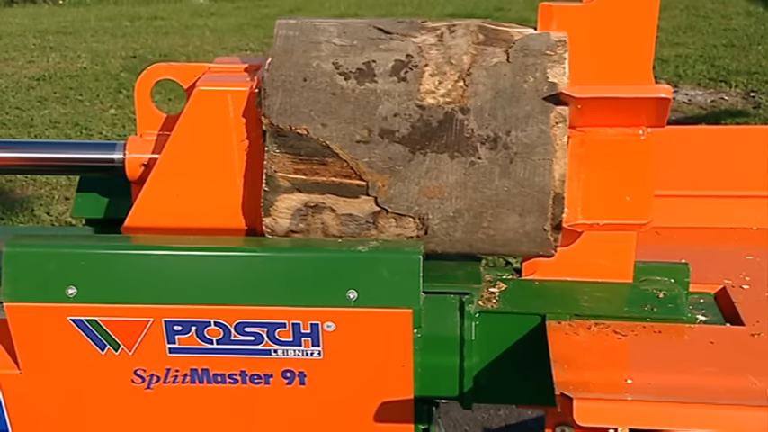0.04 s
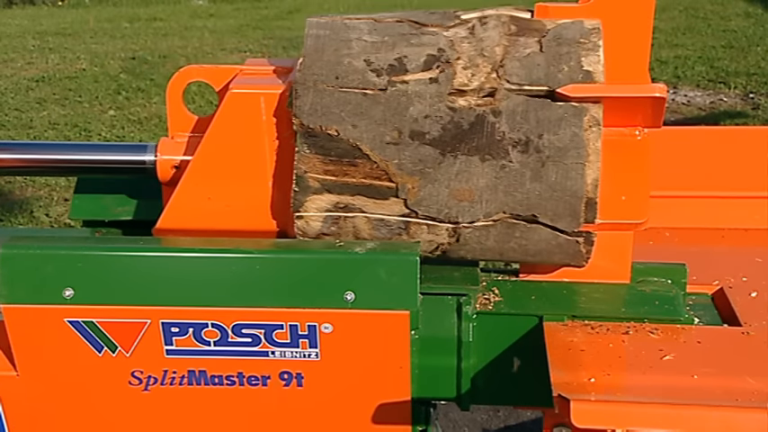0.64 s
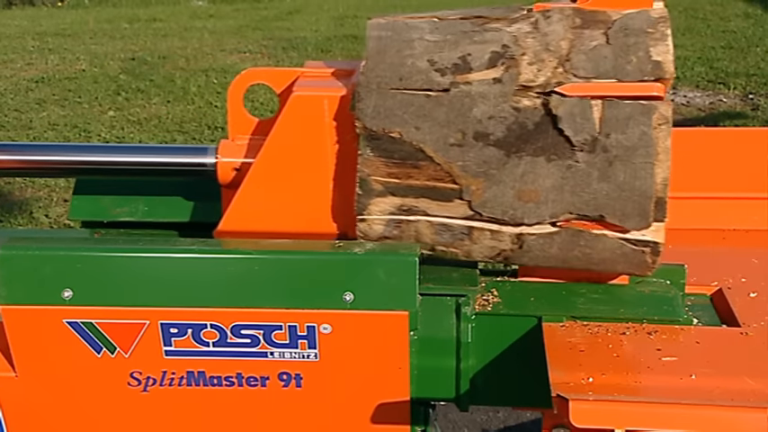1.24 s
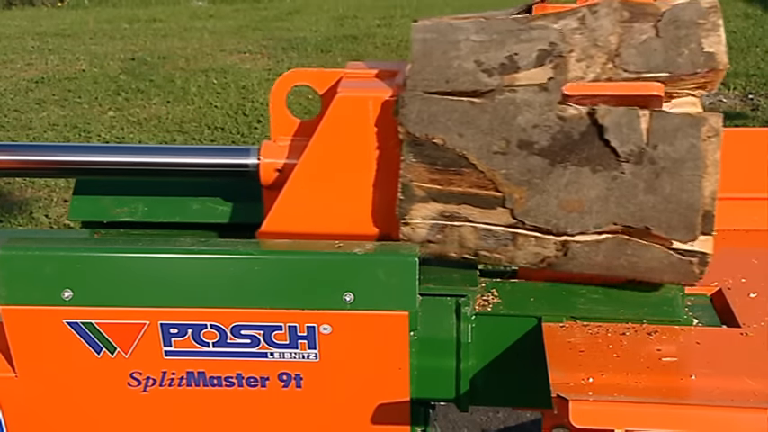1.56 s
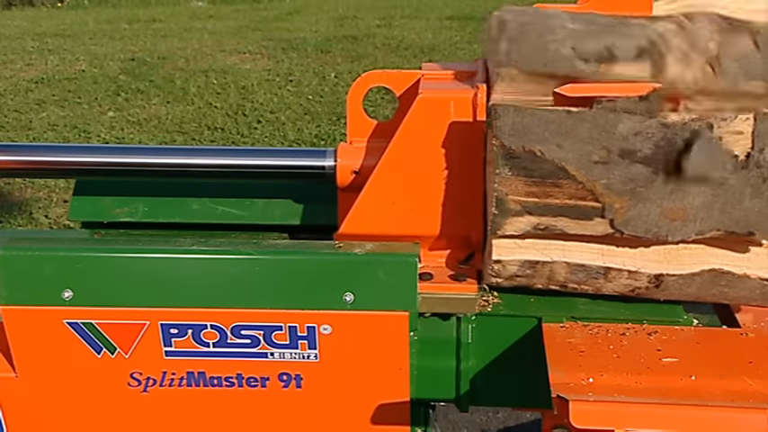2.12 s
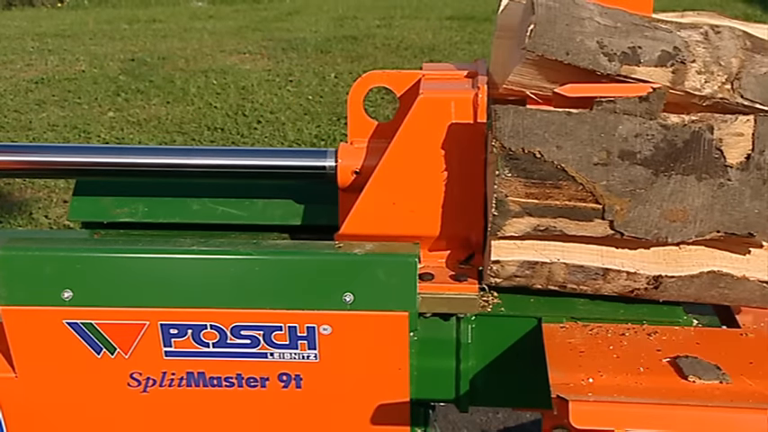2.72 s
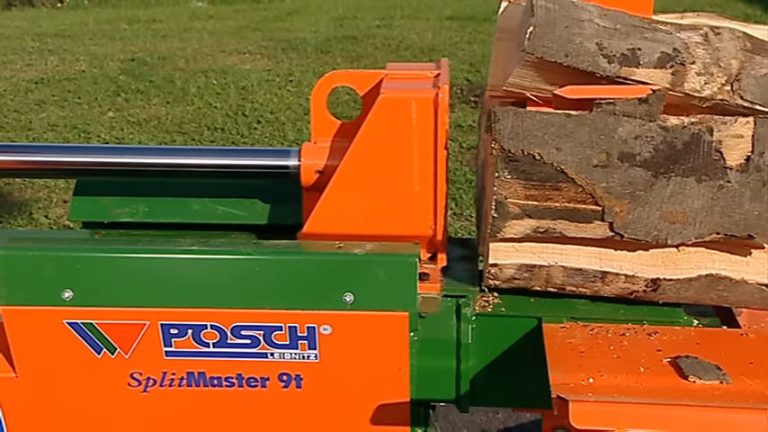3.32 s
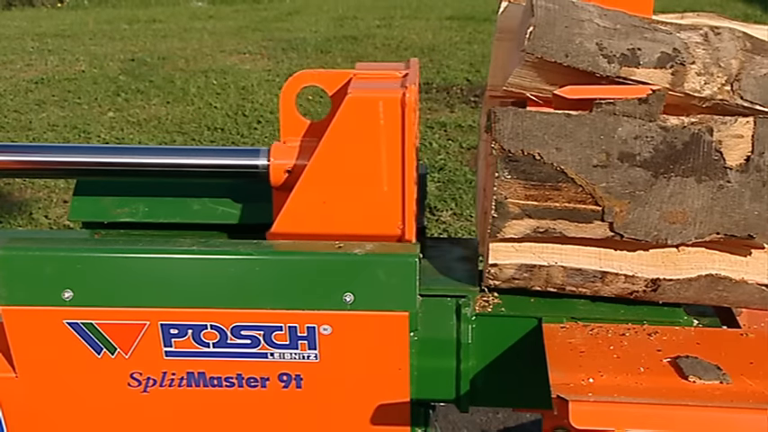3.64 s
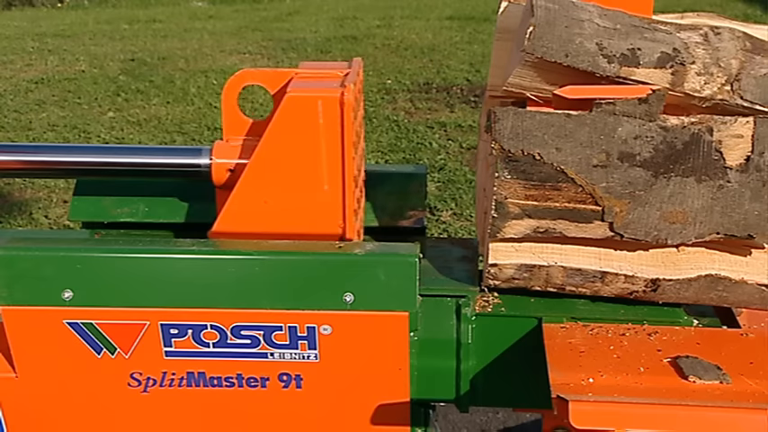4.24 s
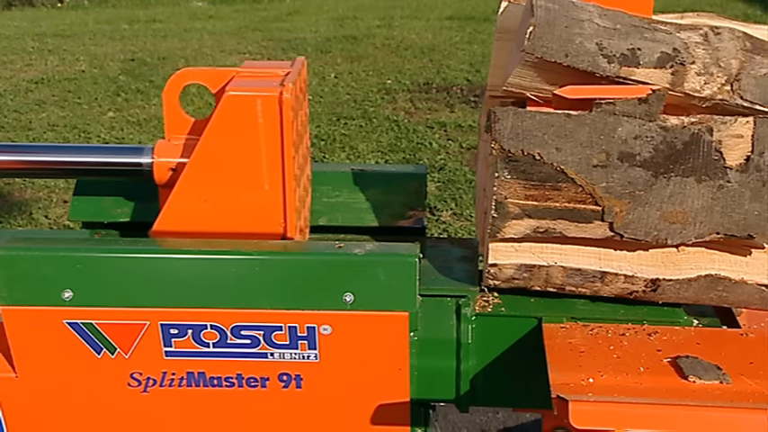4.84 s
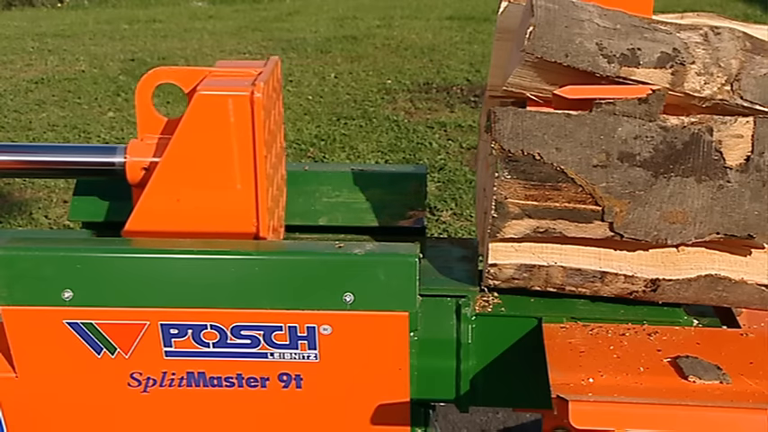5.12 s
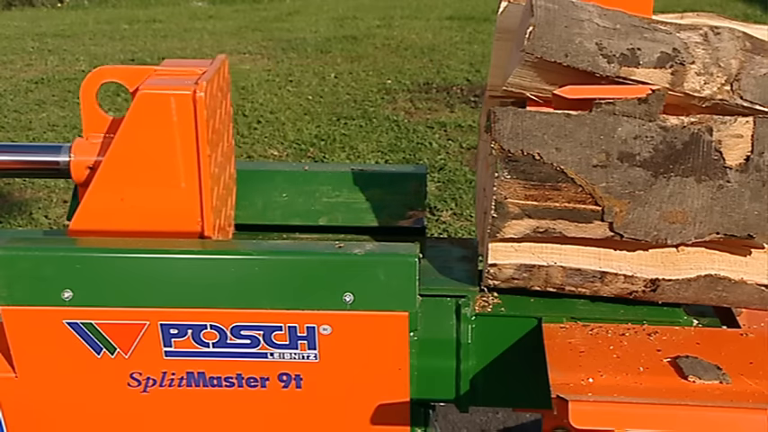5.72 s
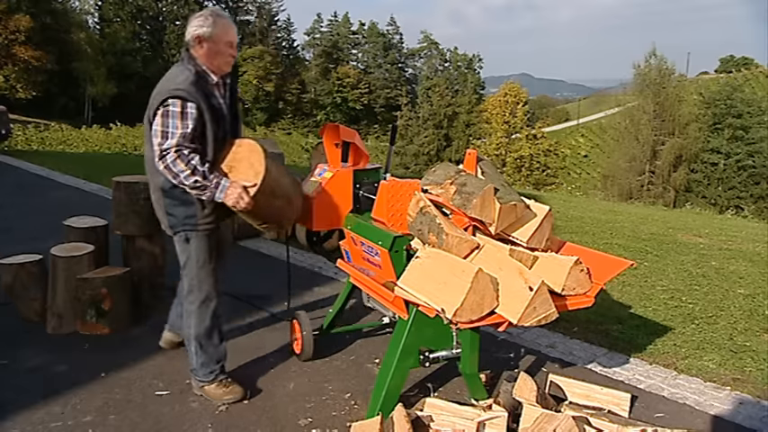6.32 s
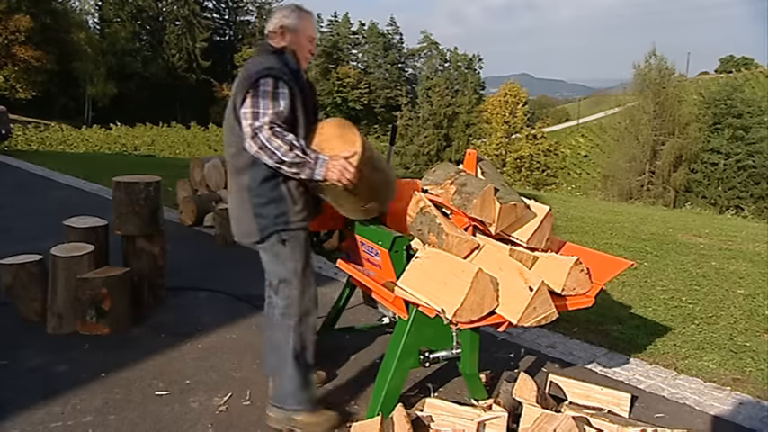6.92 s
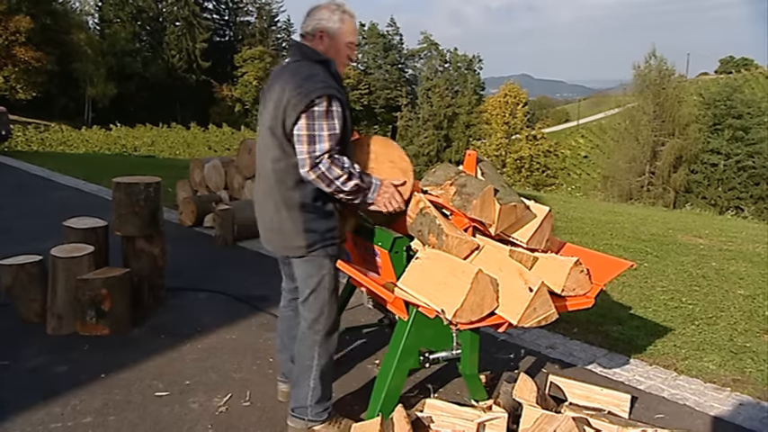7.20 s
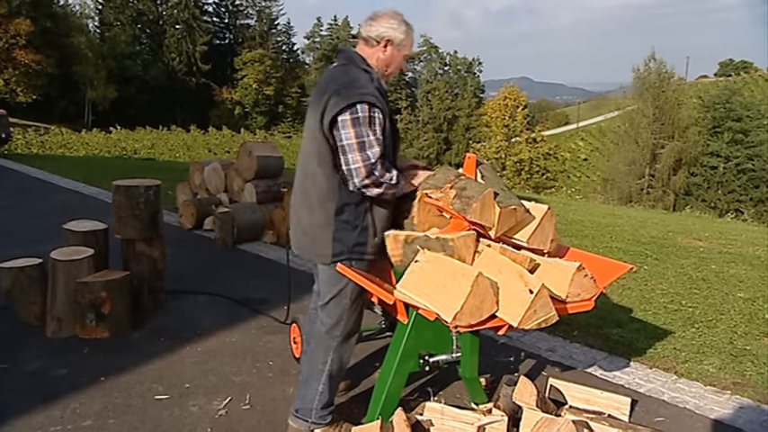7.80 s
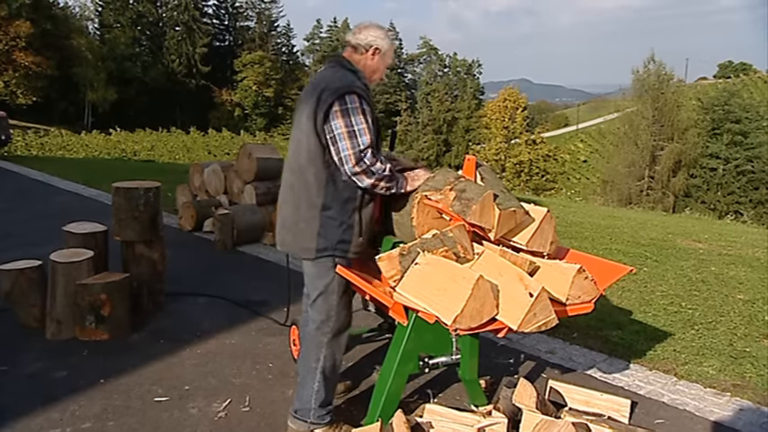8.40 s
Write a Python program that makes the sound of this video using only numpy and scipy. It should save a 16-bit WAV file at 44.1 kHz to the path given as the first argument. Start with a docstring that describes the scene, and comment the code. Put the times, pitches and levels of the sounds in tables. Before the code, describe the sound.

Wood cracks and splinters over a hydraulic splitter's steady hum outdoors; the ram returns with faint squeaks, and another log clunks down.

```python
"""An electric log splitter works outdoors in a faint breeze, heard first from close by. Its gear pump
hums and sags under load as a log is forced onto the wedge: fibres crunch and snap, and the wood tips onto
the tray. Near 3 s the ram reverses, slides back with stick-slip squeaks and, as the valve whistles,
knocks against its stop. From 6 s the listener is a few steps away: neighbouring pump tones beat in a
throb, a latch or guard clicks, and the next log is set down on the ringing steel bed."""
import sys
import numpy as np
from scipy import signal
from scipy.fft import irfft
from scipy.io import wavfile

SR = 44100
rng = np.random.default_rng(int(sys.argv[2]) if len(sys.argv) > 2 else 0)


def bounce(signal):
    """Save signal as a 16-bit WAV file at the path given by the first command-line argument."""
    frames = np.transpose(np.atleast_2d(signal))
    limited = np.clip(frames, -1, 1)
    pcm = np.round(limited * 32767).astype(np.int16)
    wavfile.write(sys.argv[1], SR, pcm)


N = 377055
T = np.arange(N) / SR

TEETH, IDLE_TURNS_PER_S, SAG_TURNS_PER_S = 12, 24.93, .33
FREE_S, REVERSE_S, STOP_S = 2.44, 2.97, 5.72  # the ram is through the log, turns back, stops
SWITCH_S = .072  # the valve's changeover time
STEP_BACK_S, SHADE_S = 6.05, (7.9, 7.7)  # the listener is farther off; a man steps in front of the pump

# Load on the pump: time_s, share_of_full_load
LOAD = [(0, .4), (1.3, 1), (1.75, 1), (2.35, 0), (2.85, 0), (3.1, .15), (5.55, .18), (5.95, 0)]
# Pump levels by working state: pushing_db, starting_back_db, arriving_db, resting_db, far_db, shaded_db
MESH_LEVELS = [(-51.5, -28.5, -33, -38.5, -46.5, -51), (-49, -38, -34.5, -36, -41.5, -43.5),
               (-54, -33, -41, -40.5, -49.5, -44), (-59, -51.5, -45, -45.5, -48, -49),
               (-86, -56.5, -50.5, -49.5, -54, -52)]  # one row for each of meshing harmonics 1 to 5
UNEVEN_LEVELS = (-8, -3, 4, 1.5, 1.5, -5)  # added to the other shaft orders
RUSH_LEVELS = (-45, -39.5, -36.5, -39.5, -45.5, -46)  # oil flow below 2 kHz
HISS_LEVELS = (-54, -49, -43.5, -47, -57, -58)  # oil flow in the treble
FIZZ_LEVELS = (-59, -56.5, -54, -53, -58, -62.5)  # oil flow in the top octave
# Lowest meshing tone while the ram pushes (its overtones follow less): time_s, gain_db
PUSH_HUM = [(.6, 4), (1.1, -2), (1.4, 3.5), (1.7, 3.5), (2, 14), (2.35, 6.5), (2.7, 12.5)]
# Swells along the ram's path, by harmonic: depth_db, travel_from_turning_point_s
SWELLS = [(2.5, 0.41), (0.3, 0.15), (1.5, 0.53), (2, 0.3), (8.5, 0.45)]
# Wavering as the man walks through the sound's path, by harmonic: spread_db
FAR_WANDER_DB = (2, 1, 1.8, 1, 1.3)
# Fourth meshing harmonic from farther off: time_s, gain_db
FAR_FOURTH_HARMONIC = [(6.05, 1.5), (6.45, -4), (6.65, 1), (7.15, 5.5), (8, -6), (8.5, 4.5)]
# Tones of unequal teeth, at multiples of the shaft speed: order, near_db, far_db
SHAFT_ORDERS = [(13, -51, -60), (19, -49, -67), (22, -60, -50), (23, -41.5, -41.5), (25, -53, -51),
                (26, -45, -48), (27, -55, -57), (28, -54, -67), (29, -53, -66), (30, -51, -69),
                (31, -55, -65), (39, -53, -59), (40, -54, -56), (43, -58, -66), (62, -63, -62),
                (67, -60, -58), (68, -60, -53), (69, -63, -56), (70, -64, -57), (71, -58, -55),
                (72, -57, -51), (76, -60, -66)]
# Thin whine of the higher meshing harmonics: harmonic, near_db, far_db
WHINE = [(8, -66, -71), (10, -69, -67), (11, -70, -67), (12, -72, -65), (13, -66.5, -71), (14, -74, -67),
         (16, -67, -68), (21, -68, -71), (28, -73, -73)]
# Bands that swell once a turn: low_hz, high_hz, near_moment_turns, far_moment_turns
THROBS = [(520, 690, .3, .88), (930, 1100, .3, .02), (1650, 1850, .55, .06)]
# Lowest throbbing band from farther off: time_s, gain_db
FAR_THROB = [(6.1, -2.5), (6.45, -4.5), (6.9, 0), (7.25, -4.5), (8.1, -2.5), (8.45, 2.5)]
# Spectra of the pump's buzz and oil hiss: frequency_hz, gain_db
FLOW_NEAR = [(40, -17), (70, -13), (150, -16), (320, -4), (700, -3), (1100, -6), (1400, -5), (1850, 0),
             (2300, -4.5), (3400, -4.5), (4500, -5.5), (5300, -6), (8000, -6.5), (12500, -8), (15800, -15)]
FLOW_FAR = [(40, 5), (150, -4.5), (400, 4), (1100, 4), (1350, -1), (1750, 6.5), (2200, -0.5), (4700, 4),
            (5300, -2.5), (8000, -7), (12000, -12.5), (15800, -13)]
# Housing resonances (flow() strengthens those above 5 kHz): centre_hz, width_hz, base_gain_db
HOUSING_NEAR = [(3880, 120, 4), (4800, 160, 4), (7690, 270, 4), (9020, 140, 5), (9600, 130, 3),
                (10720, 140, 4), (11330, 200, 6), (11890, 200, 4), (13440, 360, 6), (14020, 300, 3),
                (14620, 70, 4), (14880, 370, 6)]
HOUSING_FAR = [(2460, 65, 6.9), (3600, 170, 1.8), (5600, 74, 6), (6040, 96, 4.3), (8030, 72, 9.4),
               (8230, 71, 4.7), (9300, 160, 2.5), (10100, 180, 5), (10670, 240, 4.3), (11120, 170, 5.3),
               (11180, 190, 3.6)]
# Wood crushed against the wedge: time_s, groan_db, splinter_db
CRUSH_LEVELS = [(0, -30, -40), (.07, -27.5, -28.5), (.32, -27.5, -25.5), (.52, -31, -39), (.81, -35, -45.5),
                (.895, -30.5, -39), (1.07, -39, -50), (1.23, -44, -45), (1.34, -48.5, -55),
                (1.56, -39.5, -42.5), (1.67, -42.5, -47), (1.82, -37, -46.5), (2.08, -41, -41),
                (2.16, -30.5, -60), (2.3, -36, -52)]
# Resonances of the steel frame and tray: centre_hz, width_hz, gain_db
FRAME_RESONANCES = [(333.3, 8.1, 6), (366, 3.8, -14), (579, 68, 8), (650, 19, 4.5), (716, 14, -28),
                    (858, 56, 6.5), (1318, 97, 5.5), (1655, 50, 6), (2107, 55, 5), (2460, 110, 2.5),
                    (2950, 44, 0), (4410, 100, 6.5), (4950, 110, 5), (8100, 400, 8)]
# Spectra of crushed wood, breeze, snaps and knocks: frequency_hz, gain_db
CRUSH_SPECTRUM = [(50, -62), (100, -20.5), (230, -11.5), (330, -0.5), (450, -8), (870, -4), (1190, -11.5),
                  (1550, -10), (1930, -9.5), (4480, -11.5), (7000, -21.5), (11000, -39), (15800, -43)]
BREEZE_SPECTRUM = [(15, -13), (35, 9), (60, -1.5), (120, -5.5), (300, -13), (1000, -53)]
SNAP_SPECTRUM = [(50, -23), (130, -14), (400, 1.5), (1000, 6.5), (2200, -3.5), (3400, 1.5), (4500, 1.5),
                 (6000, 0.5), (8500, -2), (11000, -1), (15800, -14)]
KNOCK_SPECTRUM = [(30, -60), (70, -17.5), (140, -15.5), (380, -2), (513, -0.5), (728, 0.5), (1030, -3),
                  (1800, -6), (3000, -8.5), (6000, -20), (10600, -29.5), (15800, -39)]
# Sharp snaps and clicks: splinters breaking and, near 7.1 s, a latch or guard clicking:
# start_s, level_db, pitch_hz, thickness_share, brightness
SNAPS_AND_CLICKS = [(0.019, -14.5, 4460, .1, 1), (0.0416, -23, 2570, 0.1, -14), (.0695, -16, 2600, 0.5, -6),
                    (0.1047, -18.5, 4400, 0.7, -9), (0.1452, -14, 2550, .7, -16),
                    (0.1816, -15.5, 3880, 0.2, -2), (.24, -18, 4250, 0.75, -27),
                    (0.298, -18, 3950, 0.87, -5), (0.349, -16, 3380, 1, -11), (0.41, -17.5, 3930, 0.8, -14),
                    (0.4292, -19.5, 3600, 0, 3), (.5345, -27.5, 4030, 0.2, -13),
                    (0.623, -22, 4300, 0.9, -22), (0.7761, -21, 3500, 0.65, -12),
                    (.852, -26.5, 4400, 0.3, -14), (0.886, -22, 3550, 0.73, -9),
                    (.947, -25, 3760, 0.8, -12), (.9875, -29, 4200, 0.1, -16), (1.0051, -22, 5440, 0, -12),
                    (1.03, -21.5, 4730, 0.4, -3), (1.07, -32, 4600, .1, 9), (1.104, -33, 4000, .2, -7),
                    (1.1327, -25, 3300, 0.2, -6), (1.146, -30, 3100, .3, -18), (1.173, -20, 3500, 0.2, -21),
                    (1.184, -27, 4020, 0.3, -10), (1.2017, -15, 2520, 0.1, -10), (1.22, -17, 2470, 0.1, -8),
                    (1.2427, -18.5, 3700, 0.9, -2), (1.255, -25, 3300, 1, -21), (1.355, -28, 4250, .2, -18),
                    (1.417, -32, 3240, 0, -16), (1.4597, -23.5, 4330, 0.1, -4),
                    (1.475, -26, 2850, 0.6, -21), (1.508, -24, 2830, 0.8, -29),
                    (1.533, -25, 4500, 0.64, -9), (1.538, -24, 4200, .1, -14), (1.5512, -21, 4200, 0, -7),
                    (1.561, -12, 4480, 0, -11), (1.605, -18, 4640, 0.35, -20), (1.613, -25, 3700, 0, -12),
                    (1.679, -29, 3950, 0.7, -5), (1.697, -28, 4500, .1, 2), (1.712, -24.5, 4200, 0, 3),
                    (1.7634, -21, 3600, 0, -9), (1.776, -27, 4200, 0.5, -8), (1.783, -25, 4400, 0.5, -9),
                    (1.803, -20, 4350, 0.1, -19), (1.882, -30, 3800, .4, 7), (1.936, -29.5, 4180, 0, -2),
                    (1.9537, -25, 3500, 0.1, -13), (2.005, -28.5, 4400, .2, -5),
                    (2.074, -26.5, 4000, 0.9, -11), (2.157, -30, 4500, .2, -6),
                    (2.282, -32.5, 4200, 0.3, -22), (2.342, -36, 3430, .7, -20),
                    (2.4537, -27, 3100, 1, -13), (2.487, -38, 3800, .5, -18), (2.528, -37.5, 3600, .3, -20),
                    (3.0022, -22, 4380, 0.2, -12), (3.1228, -28.5, 4410, 0.1, -23),
                    (3.6556, -22, 2800, 1, -32), (7.096, -24, 4200, 0.9, 9), (7.0981, -21.5, 2950, 0.5, -9),
                    (7.953, -21, 3470, 0.65, -21)]
# Wedge or bed singing as wood rubs past: start_s, length_s, pitch_hz, level_db
SINGS = [(.03, .4, 1668, -45), (.42, .3, 1668, -44), (1.83, .14, 1668, -50), (2.33, .06, 1668, -50),
         (7.478, .06, 2955, -38)]
# Low bounces of the machine under a log or the ram: start_s, pitch_hz, level_db, t60_s
THUMPS = [(.048, 304, -20, 0.23), (.085, 348, -22, 0.23), (1.563, 55, -44, 0.19), (2.138, 634, -18, 0.076),
          (2.165, 333, -23, .1), (2.207, 320, -23, 0.086), (3.004, 354, -28, .12), (5.745, 319, -27, 0.35),
          (5.749, 472, -35, 0.35), (5.752, 383, -35, .6), (7.109, 265, -30, 0.2), (7.445, 140, -13, 0.03),
          (7.444, 408, -18.5, 0.11), (7.553, 173, -26, 0.05), (7.774, 128, -33, 0.14),
          (7.806, 169, -30, 0.095)]
# Wood and ram striking steel: start_s, level_db, bass_db, treble_db, rise_s
KNOCKS = [(0.054, -31, 13, -17, 0.0047), (1.564, -58, 12, 2, .001), (2.124, -27, 14, 6, 0.0027),
          (2.136, -30, -1, -12, 0.0027), (2.158, -34, 2, -3, .004), (2.195, -31.5, 6, 10, .008),
          (2.966, -33, -20, 2, .005), (2.984, -28, 7, 12.5, 0.0017), (2.999, -29, 5.5, -12, 0.0027),
          (5.703, -23.5, -32, 13, 0.0011), (5.735, -23.5, 2, 14, 0.0036), (5.748, -29, 14, 4, 0.0017),
          (5.773, -31.5, 6, 15, 0.0035), (7.028, -36.5, 22, -20, 0.00082),
          (7.108, -30.5, 11.5, -10, 0.0026), (7.4426, -20, 6, -0.5, 0.0011), (7.466, -25, -14, -3.5, 0.003),
          (7.487, -26.5, -1, -14, 0.0037), (7.561, -29.5, 15, -22, 0.0036), (7.592, -40, -1, 4, .002),
          (7.625, -34, 4, -3, 0.0018), (7.76, -28, 6, -28, 0.0018), (7.768, -25, 10, -11.5, 0.0017),
          (7.893, -29, -7, -11.5, 0.0018), (7.955, -33.5, 13, 4, .001)]
# Splinters tearing free: start_s, pitch_hz, level_db, t60_s
TWANGS = [(.778, 995, -18.5, 0.028), (.778, 3570, -22.5, 0.023), (.887, 1010, -26, 0.065),
          (1.031, 4380, -18, 0.012), (1.173, 1765, -29, 0.079), (1.204, 1760, -23, 0.08),
          (1.223, 1780, -27, 0.054), (1.243, 1755, -20.5, 0.057), (1.416, 3260, -27, 0.019),
          (1.764, 1890, -37, 0.056), (2.456, 3080, -31, .03)]
# Modes of a splinter: pitch_ratio, gain_db
SPLINTER_MODES = [(1, 0), (1.38, -18), (2.4, -28)]
# Bark sliding over steel: start_s, length_s, centre_hz, level_db
SCRAPES = [(2.185, 0.068, 4000, -49), (2.474, 0.035, 3900, -53), (2.952, 0.033, 3900, -37.5),
           (7.493, 0.33, 5850, -50.5), (7.702, 0.26, 6700, -54), (7.91, 0.036, 5600, -44)]
# The sliding ram's one groan: start_s, length_s, pitch_hz, level_db
RAM_GROAN = (3.63, .09, 195, -41)
# The returning ram squeaking: start_s, length_s, slip_rate_hz, centre_hz, level_db
SQUEAKS = [(4.073, 0.071, 550, 1310, -41.5), (4.552, .075, 430, 3600, -43),
           (5.056, 0.052, 470, 3600, -41.5)]
# The ram catching: start_s, level_db
PINGS = [(4.257, -50), (4.3, -36.5), (4.66, -42.5), (5.079, -42)]
# Modes of the ram's plate: pitch_hz, gain_db, t60_s
PLATE_MODES = [(2760, 2, .06), (4680, 4, 0.095), (5900, -8, .04), (6860, 2, .05), (7800, 5.5, 0.054),
               (9500, -14, .04)]
# The valve whistling as the ram comes home: start_s, length_s, from_hz, to_hz, level_db
WHISTLES = [(5.585, .11, 3900, 4330, -53), (5.61, .1, 3760, 4200, -53), (5.6, .1, 1270, 1420, -49),
            (5.8, .06, 4250, 4030, -57), (5.915, .06, 4190, 3930, -56), (5.955, .075, 4260, 3950, -55)]
# Modes of the steel bed when a log lands: pitch_hz, gain_db, t60_s
BED_MODES = [(381, -11.5, 0.59), (563, -12.5, 0.48), (640, -9, 0.73), (711, -13, 0.74), (727, -10, 0.57),
             (806, -12, 0.48), (1244, -20, 0.17), (1330, -13, 0.45), (1408, -20, 0.26), (2115, -17, 0.41),
             (2530, -20, 0.54), (2950, -24, 0.43), (3640, -24, .22), (3760, -26, 0.25)]
# Broad resonances of the bed with the log on it: centre_hz, width_hz, gain_db
BED_RESONANCES = [(397, 60, -0.5), (488, 76, -4), (550, 32, -2), (800, 90, 3), (1420, 49, 1),
                  (1710, 91, 1.5), (1880, 110, -6), (2400, 130, 2), (2680, 110, -6), (2930, 120, -3),
                  (3700, 68, 5), (4480, 86, 9), (5880, 240, 8)]


def amp(db):
    """Decibels to amplitude ratio."""
    return 10 ** (np.asarray(db) / 20)


def unit(x):
    """Scales to rms 1."""
    return x / np.sqrt(np.mean(x ** 2) + 1e-20)


def curves(rows):
    """Each column of a timed table, interpolated sample by sample."""
    times, *columns = np.transpose(rows)
    return [np.interp(T, times, column) for column in columns]


def spectrum_db(points, hz):
    """A spectrum interpolated over log frequency."""
    freqs, db = np.transpose(points)
    return np.interp(np.log(hz + 1), np.log(freqs), db)


def resonance_db(resonances, hz):
    """Resonances as bell-shaped peaks of gain."""
    return sum(db / (1 + (2 * (hz - centre) / width) ** 2) for centre, width, db in resonances)


def colour(x, db_at, size=4096):
    """Causal filter with the gain db_at(Hz)."""
    log_gain = np.log(amp(np.maximum(db_at(abs(np.fft.fftfreq(size, 1 / SR))), -100)))
    response = np.fft.ifft(np.exp(np.conj(signal.hilbert(log_gain)))).real
    return signal.oaconvolve(x, response[:size // 2])[:len(x)]


def band(x, low_hz, high_hz):
    """Band-pass filter."""
    return signal.sosfilt(signal.butter(2, [low_hz, high_hz], "band", fs=SR, output="sos"), x)


def split(x, hz):
    """Crossover: the parts of x below and above hz."""
    low = signal.sosfiltfilt(signal.butter(2, hz, fs=SR, output="sos"), x)
    return low, x - low


def drift(per_s):
    """Random fluctuation: straight lines between normal draws."""
    knots = rng.standard_normal(2000)
    return np.interp(T * per_s, np.arange(len(knots)), knots)


def add(mix, start_s, sound):
    """Superposes a sound on the mix."""
    part = mix[max(round(start_s * SR), 0):][:len(sound)]
    part += sound[:len(part)]


def before(time_s):
    """One until time_s, then a short ramp to zero."""
    return np.clip(1 - (T - time_s) / SWITCH_S, 0, 1)


def by_state(pushing, starting, arriving, resting, far, shaded):
    """Steps through the levels of the working states, gliding while the ram slides back."""
    times = [REVERSE_S, REVERSE_S + SWITCH_S, STOP_S, STOP_S + SWITCH_S]
    near = np.interp(T, times, [pushing, starting, arriving, resting])
    return np.where(T < STEP_BACK_S, near, np.interp(T, SHADE_S, [far, shaded]))


def mesh_levels(swell_period_s=.646, near_wander_db=.9, free_db=(-2.5, 0, 7, 0, 1)):
    """Amplitude modulation: meshing harmonics swell at the same places on the ram's way out and back."""
    travel_s, moving = abs(T - REVERSE_S), before(STOP_S)
    push_db = curves(PUSH_HUM)[0] * before(REVERSE_S)
    running_free = (1 - before(FREE_S)) * before(REVERSE_S)
    levels = []
    for k, (depth_db, first_s) in enumerate(SWELLS):
        swell = moving * depth_db * np.cos(2 * np.pi * (travel_s - first_s) / swell_period_s)
        wander = np.where(T < STEP_BACK_S, near_wander_db, FAR_WANDER_DB[k]) * drift(4)
        state_db = by_state(*MESH_LEVELS[k]) + push_db / (k + 1) + running_free * free_db[k]
        levels.append(state_db + swell + wander)
    levels[3] += curves(FAR_FOURTH_HARMONIC)[0] * (T >= STEP_BACK_S)
    return levels


def gear_hum(turns, mesh, far, scatter_cycles, waver_db, lead_cycles, lag_cycles=.15):
    """Beating: neighbouring shaft orders in a band come into phase once a turn and throb."""
    uneven_db = by_state(*UNEVEN_LEVELS) - 11 * curves(LOAD)[0]  # load evens out the teeth
    whine_db = -10 * before(REVERSE_S)  # weaker while the ram pushes
    # a meshing tone that leads its neighbours by a quarter cycle warbles instead of throbbing
    tones = [(TEETH * (k + 1), db, lead_cycles) for k, db in enumerate(mesh)]
    tones += [(order, db[far] + uneven_db + waver_db * drift(5.9), 0) for order, *db in SHAFT_ORDERS]
    tones += [(TEETH * k, db[far] + whine_db + waver_db * drift(6.1), 0) for k, *db in WHINE]
    out, throb_db = np.zeros(N), far * curves(FAR_THROB)[0]
    for order, db, phase in tones:
        hz, moment = order * IDLE_TURNS_PER_S, rng.random()
        if THROBS[0][0] < hz < THROBS[0][1]:
            db = db + throb_db
            phase = phase - lag_cycles * max(order - 2 * TEETH, 0)  # rounds the lowest throb
        for low_hz, high_hz, *moments in THROBS:
            if low_hz < hz < high_hz:
                moment = moments[far]
        cycles = order * (turns - moment) + phase + scatter_cycles * rng.standard_normal()
        out += amp(db) * np.cos(2 * np.pi * cycles)
    return np.sqrt(2) * out


def flow(turns, spectrum, housing, buzz_db, top_buzz_db, tooth_db, spread_db, pulsing):
    """Source and filter: a once-a-turn rattle and oil hiss pulse with each tooth and excite the housing."""
    order = np.arange(680)
    high_tooth = (order % TEETH == 0) & (order > 72)
    chance_db = spread_db * np.clip(rng.standard_normal(len(order)), -2, 2) * (1 - high_tooth / 2)
    strength = amp(chance_db + tooth_db * high_tooth) * (order > 8)
    one_turn = irfft(strength * np.exp(2j * np.pi * rng.random(len(order))), 16384)
    buzz = unit(np.interp(turns % 1, np.linspace(0, 1, len(one_turn)), one_turn))
    buzz_low, buzz_high = split(buzz, 5500)
    drive = rng.standard_normal(N) + amp(buzz_db) * buzz_low + amp(top_buzz_db) * buzz_high
    drive *= 1 + pulsing * np.cos(2 * np.pi * TEETH * turns)
    housing_db = lambda hz: resonance_db(housing, hz) * np.interp(hz, [5000, 9000], [1, 1.5])
    radiated = colour(drive, lambda hz: spectrum_db(spectrum, hz) + housing_db(hz))
    low, high = split(radiated, 1730)
    middle, top = split(high, 5340)
    rush_db = by_state(*RUSH_LEVELS) - 10 * curves(LOAD)[0]  # load quiets the rush
    rush = amp(rush_db) * low / np.std(band(radiated, 1000, 2300))
    hiss = amp(by_state(*HISS_LEVELS)) * middle / np.std(band(radiated, 3000, 7000))
    fizz = amp(by_state(*FIZZ_LEVELS)) * top / np.std(band(radiated, 8000, 15000))
    return rush + hiss + fizz


def pump():
    """Periodic excitation: gear tones are multiples of the shaft speed, so all sag together under load."""
    speed = IDLE_TURNS_PER_S - SAG_TURNS_PER_S * curves(LOAD)[0]
    turns = np.cumsum(speed * (1 + .00023 * drift(14))) / SR
    turns -= turns[round(STEP_BACK_S * SR)]
    mesh = mesh_levels()
    lead = before(STOP_S) / 4  # the throb comes out once the ram rests
    near = gear_hum(turns, mesh, far=False, scatter_cycles=.07, waver_db=1.5, lead_cycles=lead)
    near += flow(turns, FLOW_NEAR, HOUSING_NEAR,
                 buzz_db=-3, top_buzz_db=4, tooth_db=6, spread_db=4.5, pulsing=.2)
    far = gear_hum(turns, mesh, far=True, scatter_cycles=.055, waver_db=1.2, lead_cycles=0)
    far += flow(turns, FLOW_FAR, HOUSING_FAR,
                buzz_db=.5, top_buzz_db=1, tooth_db=7.5, spread_db=2.5, pulsing=.1)
    return np.where(T < STEP_BACK_S, near, far)


def fibre_impulses(per_s, spread_db):
    """Shot noise: impulses of random time, size and sign."""
    sizes = amp(spread_db * np.minimum(rng.exponential(1, N), 3.5)) * rng.choice([-1, 1], N)
    return unit(sizes * (rng.random(N) < per_s / SR))


def wood_crush(fizz=.39, tick_t60_s=.12):
    """Acoustic emission: countless fibres give way, the frame groans with them and splinters crackle."""
    gain_db = lambda hz: spectrum_db(CRUSH_SPECTRUM, hz) + resonance_db(FRAME_RESONANCES, hz)
    groan, _ = split(colour(fibre_impulses(per_s=1500, spread_db=2.5), gain_db), 1960)
    tick_decay = amp(-60 * np.arange(600) / SR / tick_t60_s)
    bursts = signal.oaconvolve(abs(fibre_impulses(per_s=500, spread_db=6)), tick_decay)[:N]
    ticks = unit(bursts * rng.standard_normal(N))
    _, crackle = split(colour(ticks + fizz * rng.standard_normal(N), gain_db), 1240)
    groan_db, splinter_db = curves(CRUSH_LEVELS)
    pressing = np.interp(T, [2.25, 2.4], [1, 0])
    return pressing * (amp(groan_db - 1) * unit(groan) + amp(splinter_db - 3) * unit(crackle))


def breeze(near_db=-80, far_db=-57.5, gust_db=3, lull_db=2):
    """Turbulence: a lumpy low rumble, stronger out in the open."""
    rumble = unit(colour(rng.standard_normal(N), lambda hz: spectrum_db(BREEZE_SPECTRUM, hz)))
    level_db = np.where(T < STEP_BACK_S, near_db, far_db)
    return rumble * amp(level_db + gust_db * drift(3.9) + lull_db * drift(8.8))


def snaps_and_clicks(tail_db=-21, tail_t60_s=.17, tilt=.59):
    """Transient excitation: a splinter, latch or guard sounds a burst at its resonances, then a faint tail."""
    out, t = np.zeros(N), np.arange(5000) / SR
    for start_s, db, pitch_hz, thickness, brightness in SNAPS_AND_CLICKS + small_snaps():
        # a thick piece has more body and rings longer
        body_db = tilt * np.interp(thickness, [0, 1], [-27, 3]) + 2
        t60 = np.interp(thickness, [0, 1], [.009, .028])
        burst = rng.standard_normal(len(t)) * (amp(-60 * t / t60) + amp(tail_db - 60 * t / tail_t60_s))
        balance = [(900, body_db), (2500, 0), (5000, 0), (10000, tilt * brightness + 5)]
        modes = [(pitch_hz, 500, 8), (pitch_hz / 3.5, 300, 5)]  # centre_hz, width_hz, gain_db
        modes += [(pitch_hz * 2 ** octaves, 250, 7) for octaves in rng.uniform(-.973, 1, 3)]
        snap = colour(burst, lambda hz: spectrum_db(SNAP_SPECTRUM, hz) + spectrum_db(balance, hz)
                      + resonance_db(modes, hz), size=512)
        add(out, start_s, amp(db) * snap / (1.99 * np.std(snap[:130])))
    return out


def steel_singing(waver_hz=9, flutter_db=3):
    """Self-excited vibration: friction keeps one mode of the steel ringing, unsteadily."""
    out = np.zeros(N)
    for start_s, length_s, hz, db in SINGS:
        size = round(length_s * SR)
        cycles = np.cumsum(hz + waver_hz * drift(60)[:size]) / SR
        tone = np.sin(2 * np.pi * cycles) * amp(flutter_db * drift(25)[:size])
        add(out, start_s, amp(db) * unit(tone * np.sqrt(np.hanning(size))))
    return out


def machine_thumps(rise_s=.0015):
    """Damped oscillation: the whole machine bounces briefly under a heavy blow."""
    out, t = np.zeros(N), np.arange(SR // 2) / SR
    rise = 1 - np.exp(-t / rise_s)
    for start_s, hz, db, t60 in THUMPS:
        add(out, start_s, rise * amp(db - 60 * t / t60) * np.sin(2 * np.pi * hz * t))
    return out


def steel_knocks(middling_db=-22.5, middling_t60_s=.4, contact_t60_s=.023, ring_db=-20, ring_life=1.88):
    """Impact excitation: the frame, or later the bed, rings on after a blow, its treble dying first."""
    out, t = np.zeros(N), np.arange(SR) / SR
    contact = 2.2 * amp(-60 * t / contact_t60_s)
    for start_s, db, bass_db, treble_db, rise_s in KNOCKS:
        on_frame = start_s < STEP_BACK_S
        resonances = FRAME_RESONANCES if on_frame else BED_RESONANCES
        t60 = middling_t60_s * amp(.79 * (db - middling_db))  # harder blows rattle longer
        low, high = split(rng.standard_normal(len(t)), 2200)
        rattle = low * (amp(-60 * t / t60) + contact) + high * (amp(-120 * t / t60) + contact)
        if on_frame:
            for hz, width_hz, _ in resonances:  # the narrowest modes outlast the rattle
                decay = np.exp(-np.pi * width_hz * t / ring_life)
                rattle += amp(ring_db) * decay * np.sin(2 * np.pi * (hz * t + rng.random()))
        balance = [(200, bass_db), (800, 0), (1400, 0), (5000, treble_db)]
        rise = 1 - np.exp(-t / rise_s)
        knock = colour(rattle * rise, lambda hz: spectrum_db(KNOCK_SPECTRUM, hz)
                       + spectrum_db(balance, hz) + resonance_db(resonances, hz))
        knock /= np.std(knock[:900])
        if not on_frame:
            for hz, mode_db, mode_t60 in BED_MODES:
                decay = amp(mode_db + min(spectrum_db(balance, hz), 0) - 60 * t / mode_t60)
                knock += rise * decay * np.sin(2 * np.pi * (hz * t + rng.random()))
        add(out, start_s, amp(db) * knock)
    return out


def splinter_twangs():
    """Free vibration: a long splinter rings in inharmonic modes each time it slips."""
    out, t = np.zeros(N), np.arange(3000) / SR
    for start_s, hz, db, t60 in TWANGS:
        ring = sum(amp(mode_db) * np.sin(2 * np.pi * hz * ratio * t) for ratio, mode_db in SPLINTER_MODES)
        add(out, start_s, amp(db - 60 * t / t60) * ring)
    return out


def small_snaps(count=32, from_s=.85, to_s=2.12, level_db=-32.5, spread_db=3.5, brightness=-1):
    """Crack propagation: lesser fibres fail in turn at uneven moments; rows as in SNAPS_AND_CLICKS."""
    rows = []
    for k, (when, size, pitch, thickness) in enumerate(rng.random((count, 4))):
        start_s = from_s + (to_s - from_s) * (k + when) / count
        pitch_hz = np.interp(pitch, [0, 1], [3040, 4860])
        rows.append((start_s, level_db + spread_db * (2 * size - 1), pitch_hz, thickness, brightness))
    return rows


def bark_scrapes(grit_db=4, grit_per_s=500, squeak_db=2, squeak_width_hz=450):
    """Sliding friction: gritty noise with a hint of a squeak swells and fades."""
    out = np.zeros(N)
    for start_s, length_s, hz, db in SCRAPES:
        grit = (rng.standard_normal(N) * amp(grit_db * drift(grit_per_s)))[:round(length_s * SR)]
        balance = [(hz / 10, -42), (hz / 2, -7), (hz, 0), (hz * 2, -14)]
        squeak = [(hz, squeak_width_hz, squeak_db)]
        scrape = colour(grit, lambda f: spectrum_db(balance, f) + resonance_db(squeak, f), size=512)
        add(out, start_s, amp(db) * unit(scrape * np.hanning(len(grit))))
    return out


def ram_groan():
    """Friction-induced vibration: one short low note as the ram rubs along its guide."""
    start_s, length_s, hz, db = RAM_GROAN
    out, t = np.zeros(N), np.arange(0, length_s, 1 / SR)
    add(out, start_s, amp(db) * unit(np.hanning(len(t)) * np.sin(2 * np.pi * hz * t)))
    return out


def ram_squeaks(skirt_db=-16, jitter=.022, spread_db=3):
    """Stick-slip motion: nearly even slips on the guide give harmonics, loudest around one pitch."""
    out = np.zeros(N)
    for start_s, length_s, slip_hz, centre_hz, db in SQUEAKS:
        t = np.arange(0, length_s, 1 / SR)
        cycles = np.cumsum(slip_hz * (1 + jitter * drift(500)[:len(t)])) / SR
        tone = np.zeros(len(t))
        for k in range(2, 22):
            gain_db = skirt_db * abs(np.log(k * slip_hz / centre_hz)) + spread_db * rng.standard_normal()
            tone += amp(gain_db) * np.sin(2 * np.pi * k * (cycles + rng.random()))
        add(out, start_s, amp(db) * unit(tone * np.hanning(len(t))))
    return out


def ram_pings(rise_s=.0032, rasp_hz=(2800, 9300), rasp_db=2.5, rasp_t60_s=.07):
    """Modal ringing: the ram catches with a brief rasp and its steel plate sounds."""
    out, t = np.zeros(N), np.arange(8000) / SR
    ring = sum(amp(db - 60 * t / t60) * np.sin(2 * np.pi * hz * t) for hz, db, t60 in PLATE_MODES)
    for start_s, db in PINGS:
        rasp = unit(band(rng.standard_normal(len(t)), *rasp_hz)) * amp(rasp_db - 60 * t / rasp_t60_s)
        add(out, start_s, amp(db) * (1 - np.exp(-t / rise_s)) * (ring + rasp))
    return out


def valve_whistles(waver_hz=90, waver_per_s=600):
    """Flow tones: oil in the valve whistles upward as it closes and downward as the pressure lets go."""
    out = np.zeros(N)
    for start_s, length_s, from_hz, to_hz, db in WHISTLES:
        size = round(length_s * SR)
        hz = np.linspace(from_hz, to_hz, size) + waver_hz * drift(waver_per_s)[:size]
        tone = np.sin(2 * np.pi * np.cumsum(hz) / SR)
        add(out, start_s, amp(db) * unit(tone * np.sqrt(np.hanning(size))))
    return out


def scene():
    """Superposition: machine, wood and air add in one channel."""
    hydraulics = pump() + valve_whistles()
    crackle_and_ring = wood_crush() + steel_singing() + snaps_and_clicks() + splinter_twangs()
    contacts = steel_knocks() + machine_thumps() + bark_scrapes()
    ram = ram_squeaks() + ram_pings() + ram_groan()
    return (hydraulics + crackle_and_ring + contacts + ram + breeze())[None]


def record(dry):
    """Band limiting: a steep low-pass at 15.9 kHz."""
    low_pass = signal.firwin(401, 15900, window=("kaiser", 9), fs=SR)
    return signal.oaconvolve(dry, low_pass[None], "same")


dry = scene()
out = record(dry)
bounce(out)
```